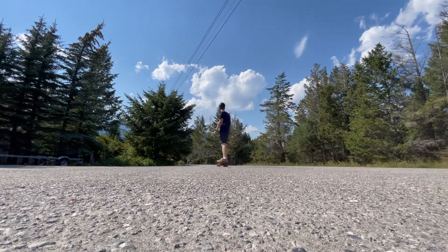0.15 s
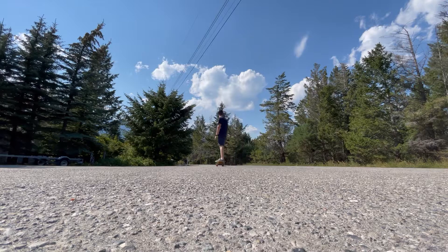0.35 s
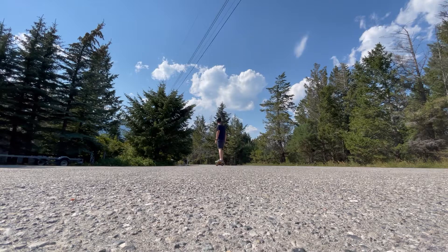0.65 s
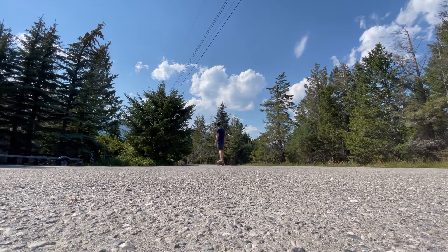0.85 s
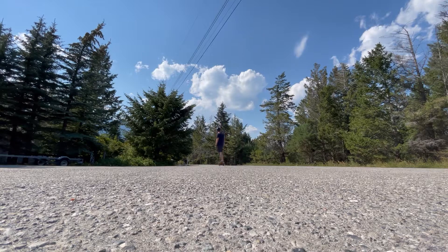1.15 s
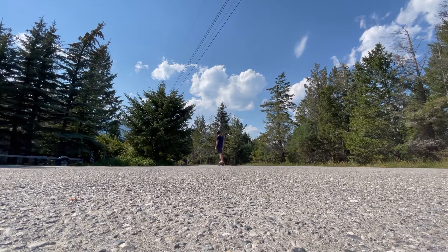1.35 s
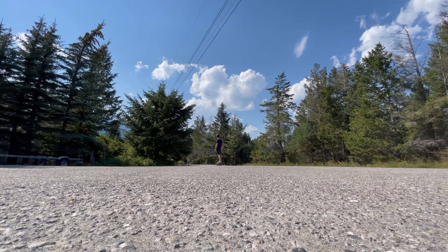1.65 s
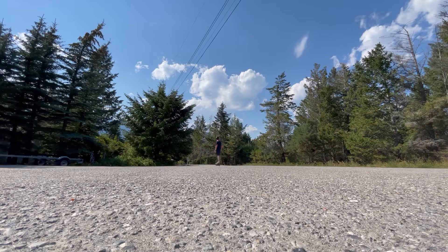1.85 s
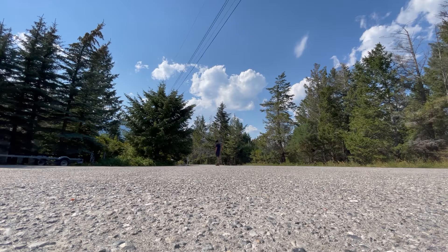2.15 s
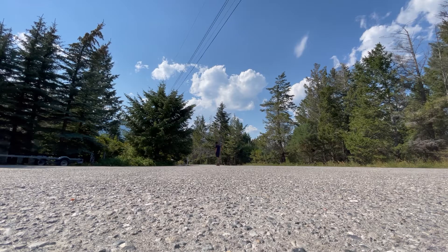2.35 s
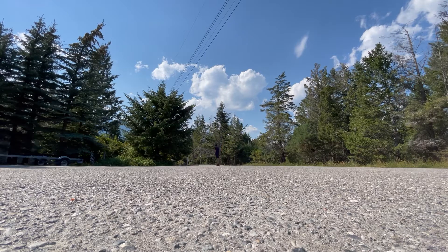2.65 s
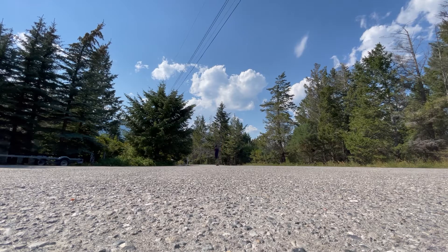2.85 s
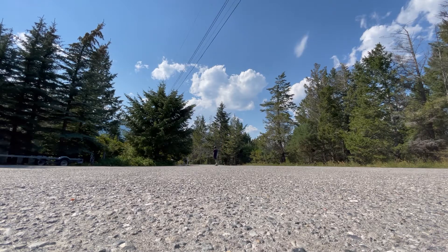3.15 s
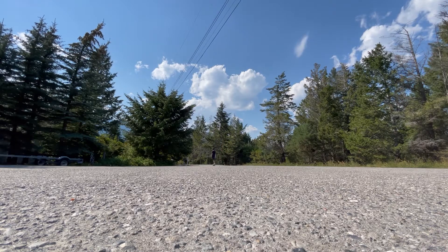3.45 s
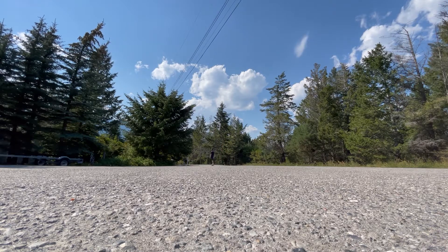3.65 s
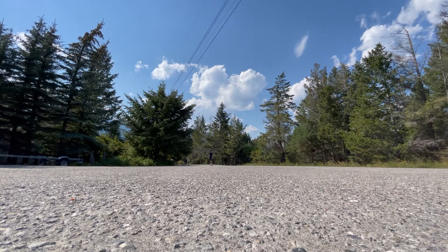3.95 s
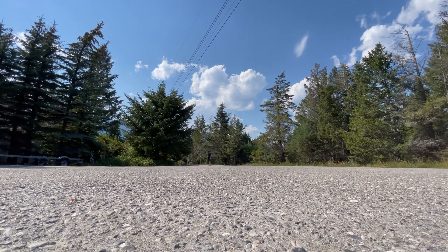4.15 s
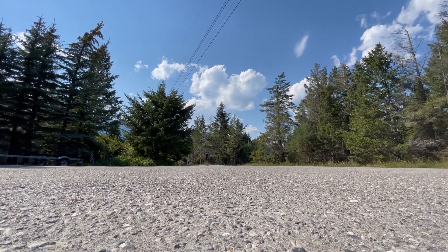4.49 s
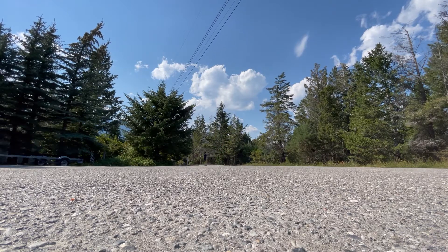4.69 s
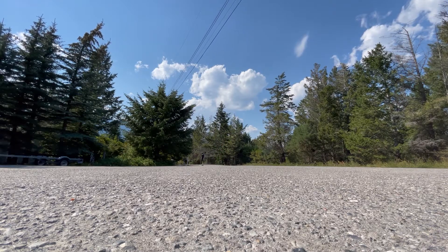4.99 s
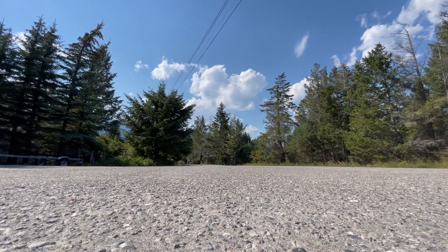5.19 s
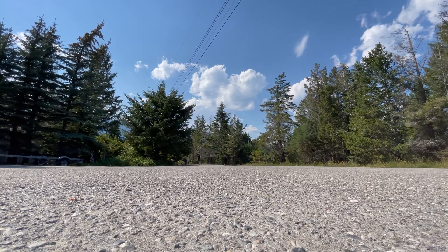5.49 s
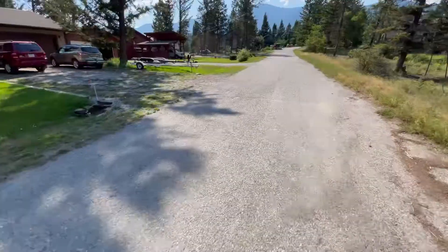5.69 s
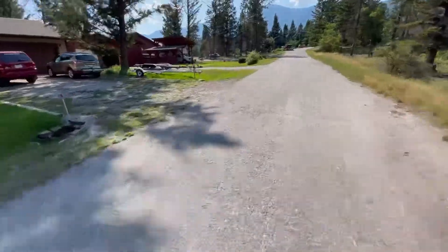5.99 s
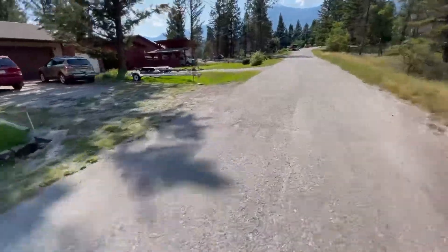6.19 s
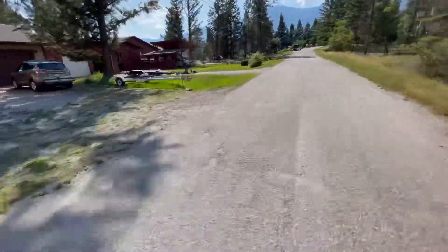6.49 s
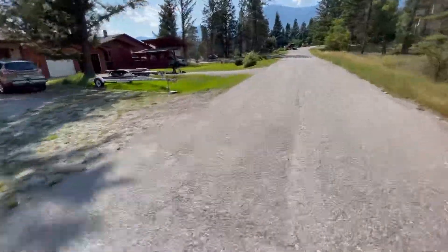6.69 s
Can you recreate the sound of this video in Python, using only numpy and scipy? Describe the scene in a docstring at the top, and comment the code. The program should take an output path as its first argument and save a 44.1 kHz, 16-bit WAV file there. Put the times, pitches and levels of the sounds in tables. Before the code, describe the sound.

A skateboard rumbles and clacks away over coarse asphalt, fading to faint rolling and bird chips, then abruptly a loud, close, bassy wheel rumble.

```python
"""An electric skateboard rolls away over coarse asphalt from a phone lying on the road: noise driven by
stony contact force rings deck, wheels and trucks, under a high whine, port wind and rustling trees.
Knocks, clacks, ticks and thuds are short bursts and damped tones; later a bird chips in gliding sines.
A cut, a blink of silence, then the same wheels heard from on board, loud enough to clip."""
import sys
import numpy as np
from scipy import signal
from scipy.fft import rfft, irfft, next_fast_len
from scipy.io import wavfile
from scipy.ndimage import uniform_filter1d

SR = 44100
rng = np.random.default_rng(int(sys.argv[2]) if len(sys.argv) > 2 else 0)


def generate_wav(sig):
    """Save sig (samples, or channels by samples) to the path in sys.argv[1] as 16-bit PCM at SR."""
    pcm = np.round(np.clip(np.atleast_2d(sig).T, -1, 1) * 32767).astype(np.int16)
    wavfile.write(sys.argv[1], SR, pcm)


N = 301203
FAST = next_fast_len(N)
T = np.arange(N) / SR
HZ = np.fft.rfftfreq(FAST, 1 / SR)


def undb(db):
    """Gain of a level in dB."""
    return 10 ** (np.asarray(db) / 20)


def level(x, db):
    """Scale so that the mean of the channels has this rms."""
    return x * undb(db) / np.sqrt(np.mean(np.atleast_2d(x).mean(axis=0) ** 2))


def spectrum(x):
    """Into the frequency domain."""
    return rfft(x, n=FAST)


def sound(bins):
    """Back into time."""
    return irfft(bins, FAST)[..., :N]


def over_hz(table):
    """Columns of a table, joined on a log-frequency axis."""
    hz, *columns = np.transpose(table)
    return [np.interp(np.log(HZ + 1), np.log(hz), c) for c in columns]


def causal(db):
    """Minimum-phase response with this gain, so nothing rings before a blow."""
    cepstrum = irfft(db * np.log(10) / 20, FAST)
    cepstrum[1:FAST // 2] *= 2
    cepstrum[FAST // 2 + 1:] = 0
    return np.exp(rfft(cepstrum))


def walk(rate):
    """Random levels held 1 / rate s and slewed twice; spread near 1."""
    k = int(SR / rate)
    steps = np.repeat(rng.standard_normal(N // k + 1), k)
    return np.sqrt(2) * uniform_filter1d(uniform_filter1d(steps, k), k)[:N]


def bursts(rows, t60_ms, rise_ms):
    """Envelope of blows (start_s, level_db): quick linear rise times a 60 dB exponential fall."""
    env = np.zeros(N)
    for start_s, level_db in rows:
        span = slice(int(start_s * SR), int(start_s * SR) + 8192)
        t = T[span] - start_s
        env[span] += undb(level_db - 60 * t / (t60_ms / 1000)) * np.clip(1000 * t / rise_ms, 0, 1)
    return env


def stones(rate, spread_db, decay_ms):
    """Uneven contact force: random stones of varied strength over a smooth road; rms 1."""
    hits = (rng.random(N) < rate / SR) * undb(spread_db * rng.exponential(size=N))
    force = 1 + signal.lfilter([1], [1, -np.exp(-1000 / decay_ms / SR)], hits)
    return force / np.sqrt(np.mean(force ** 2))


# rolling spectrum at the roadside and on board: hz [Hz], relative level_db [dB per Hz]
FAR_PATH = [(35, -36), (60, -7.5), (130, -3.5), (330, -3), (600, -3), (900, -6), (1230, -8), (1650, -8.5),
            (1850, -11), (2300, -14.5), (3500, -17.5), (5000, -23), (7300, -29.5), (11000, -41),
            (13000, -72)]
NEAR_PATH = [(60, -21.5), (170, -1), (400, 1), (600, -6), (900, -14.5), (1250, -21), (1900, -28),
             (2600, -36), (4000, -36.5), (7500, -41.5), (11000, -47.5), (12800, -70), (14000, -49),
             (15700, -50)]
# the two ports: hz [Hz], likeness [0-1], phase by which right leads [rad], left minus right pan_db [dB]
FAR_PORTS = [(60, .93, 0, -2), (240, .97, 0, -2), (390, .9, 0, -1.6), (650, .5, -.4, -1),
             (1100, .22, .7, -2.2), (1460, .9, 1.6, -2.7), (1800, .72, 2.1, -2.2),(2300, .62, 3, .8),
             (3600, .66, 3.6, -2.9), (5100, .66, 3.3, -3.6), (6200, .62, 3.3, -12.5),
             (8200, .34, 4.5, -8.5), (9800, .4, 4, 0), (11000, .75, 6.2, 1)]
NEAR_PORTS = [(100, .5, -1.2, .3), (200, .45, -.6, 0), (300, .58, .1, -.8), (500, .35, 1.1, -3.8),
              (1100, .62, 1, -1.2), (1460, .55, 2.5, -2.7), (1900, .48, 0, 4), (2300, .5, .3, 6),
              (3100, .68, 2.2, 2), (3700, .5, 2.5, -.5), (5000, .2, 5, -1.5), (7000, .35, 5.3, -3),
              (9800, .4, 4.6, -1), (11000, .62, 6.2, 0), (14000, .7, 7.6, -1)]
# resonances of deck, wheels and trucks: pitch_hz [Hz], width_hz [Hz], boost_db [dB]
FAR_MODES = [(85.2, 24, 12), (224, 110, 9.5), (295, 35, 4), (1040, 33, 8.5), (1490, 175, 8), (6060, 890, 4)]
NEAR_MODES = [(80, 61, 9.6), (295, 57, 2.8), (420, 110, 1), (1450, 210, 7.5), (3120, 690, 8.6),
              (6200, 350, 2.7)]


def wheels(force, path, ports, modes, share):
    """Noise driven by the contact force rings the board and reaches both ports, partly alike, partly scattered."""
    like, lead, pan_db = over_hz(ports)
    body_db = over_hz(path)[0] + 20 * np.log10(share)
    body_db = body_db + sum(boost / (1 + (2 * (HZ - hz) / width) ** 2) for hz, width, boost in modes)
    body = causal(body_db) * undb(np.array([pan_db, -pan_db]) / 2)
    turn = np.exp(np.array([-lead, lead]) * 1j / 2)
    both, *own = spectrum(rng.standard_normal((3, N)) * force)
    alike_power = like * abs((body * turn).mean(axis=0)) ** 2
    own_power = (1 - like) * (abs(body) ** 2).mean(axis=0) / 2
    heard = sound(body * (np.sqrt(like) * turn * both + np.sqrt(1 - like) * np.array(own)))
    return heard / np.sqrt((alike_power + own_power).mean())  # force 1 gives rms 1


def low_share(split_hz):
    """Amplitude share of the rolling sound below the split."""
    return 1 / np.sqrt(1 + (HZ / split_hz) ** 8)


def deck_share(deck_hz):
    """The heavy deck evens out single stones below this pitch."""
    return 1 / np.sqrt(1 + (HZ / deck_hz) ** 6)


def drone(drone_db, where, deck_hz):
    """Smooth rolling noise, free of single stones, rings the heavy deck."""
    return wheels(undb(drone_db), *where, deck_share(deck_hz))


def rumble(rumble_db, where, deck_hz, split_hz, stones_s, rattle_db):
    """Stones drum the wheels in the band between drone and grit."""
    share = low_share(split_hz) * np.sqrt(np.clip(1 - deck_share(deck_hz) ** 2, 1e-9, 1))
    return wheels(undb(rumble_db) * stones(stones_s, rattle_db, 1.5), *where, share)


def grit(grit_db, where, split_hz, rough_db):
    """Loose grains under the wheels hiss and crackle above the split."""
    share = np.sqrt(np.clip(1 - low_share(split_hz) ** 2, 1e-9, 1))
    return wheels(undb(grit_db) * stones(70, rough_db, 2.9), *where, share)


def whine(hz, width_hz):
    """Switching tone of the motor drive, blurred by load and speed."""
    core = 1 / (1 + ((HZ - hz) / width_hz) ** 2)
    skirt = .08 / (1 + ((HZ - hz) / (6 * width_hz)) ** 4)
    both, left, right = rng.standard_normal((3, N))
    return level(sound((core + skirt) * spectrum([both + .45 * left, both + 0.5 * right])), 0)


# wind pressure spectrum: hz [Hz], relative level_db [dB per Hz]
WIND = [(15, -44), (30, -8), (45, -3), (65, 4), (88, -3), (110, -3.5), (150, -11), (200, -23), (350, -23),
        (800, -57), (3000, -120)]
# gusts on the ports: middle_s [s], length_s [s], peak level_db [dB], left minus right pan_db [dB]
GUSTS = [(0.15, 0.26, -35, -8), (0.513, 0.15, -40, 1), (0.965, 0.19, -34, -2), (1.254, 0.23, -43, -13),
         (1.683, 0.12, -35, 0), (2.08, 0.19, -33, -4), (2.36, 0.13, -37.5, -11), (2.7, 0.4, -40.5, 1),
         (2.962, 0.1, -43, 12), (4.07, 0.12, -34.5, -3), (4.25, 0.063, -29.5, -4), (4.56, 0.16, -49, -9),
         (4.896, 0.3, -45, -4), (5.218, 0.098, -43, -8), (5.47, 0.26, -42, -10), (5.888, 0.12, -14.5, 2),
         (6.22, 0.13, -18, 1), (6.696, 0.23, -15.5, -1)]


def wind(breeze_db, opposed, bottom_hz):
    """Low buffeting, partly separate at each port, partly opposed; gusts swell and sink over a steady breeze."""
    power = undb(2 * breeze_db)
    for middle_s, length_s, level_db, pan_db in GUSTS:
        peak_power = undb(2 * level_db + np.array([[pan_db], [-pan_db]]))
        power = power + peak_power * np.exp(-(2 * (T - middle_s) / length_s) ** 2)
    both, left, right = rng.standard_normal((3, N))
    colour = undb(over_hz(WIND)[0]) * HZ ** 2 / (HZ ** 2 + bottom_hz ** 2)
    push = sound(colour * spectrum([left + opposed * both, right - opposed * both]))
    return push / np.std((push[0] - push[1]) / 2) * np.sqrt(power)


# rustle spectrum of the trees: hz [Hz], relative level_db [dB per Hz]
TREES = [(120, -42), (200, -36), (338, -4), (416, -8), (640, -0.5), (1600, -9), (1850, -13), (3300, -18.5),
         (3900, -20.5), (4400, -29), (9000, -37.5), (11700, -68), (19800, -120)]


def trees():
    """Soft, wide rustle of needles: shaped noise, separate at each port, its level wandering together."""
    rustle = rng.standard_normal((2, N)) * undb(walk(2.89))
    return level(sound(undb(over_hz(TREES)[0]) * spectrum(rustle)), -42)


# wheels over large stones: start_s [s], clack level_db [dB], clack pitch_hz [Hz],
# thump_db [dB relative to the clack]
BUMPS = [(0.032, -13, 1540, -5.5), (0.064, -11.5, 1480, -16), (0.1, -19, 1490, -19), (0.119, -25, 915, -11),
         (0.216, -14.5, 696, -5), (0.2195, -14.5, 1510, -12), (0.25, -22, 1510, -12),
         (0.254, -27, 690, -3.5), (0.343, -17, 1540, -11), (0.379, -16, 1520, -8), (0.393, -19, 1460, -10),
         (0.457, -21.5, 1180, -3.5), (0.492, -20, 1480, -10), (0.599, -18, 980, -2),
         (0.599, -21, 1520, -13), (0.633, -15.5, 1440, -6), (0.726, -21, 600, -11), (0.743, -20, 660, -3),
         (0.746, -19, 1540, -18), (0.795, -17.5, 1500, -5), (0.84, -19.5, 1440, -8),
         (0.971, -14.5, 1456, -11), (1.028, -21, 1030, -3), (1.173, -18.5, 1060, -15),
         (1.29, -22, 1440, -4), (1.323, -19.5, 678, -13), (1.367, -25, 1090, -20), (1.439, -20.5, 1010, -4),
         (1.476, -22, 1450, -4.5), (1.863, -27, 633, -2), (1.934, -28.5, 678, -6), (2.129, -27, 1040, -5),
         (2.215, -29, 668, -3), (2.351, -22, 670, -10), (2.573, -25.5, 1060, -6), (2.748, -27, 600, -11),
         (2.974, -19.5, 593, -4), (3.092, -27, 685, -8), (3.164, -27, 705, -12), (3.219, -35, 740, -13),
         (3.25, -22, 780, -12), (3.546, -32, 1490, 2), (3.662, -31, 740, -14), (3.905, -23.5, 1050, -8),
         (4.019, -25, 1510, -1.5), (4.259, -29, 635, -4), (4.353, -25, 1460, -3), (4.611, -27, 1460, -2.5),
         (4.909, -29, 710, -11), (4.932, -29, 800, -6), (4.955, -25, 750, -8), (5.213, -32, 775, -8),
         (5.348, -32.5, 974, -1), (5.703, -13, 706, -12), (5.73, -12, 651, -6), (5.744, -8.5, 622, -6),
         (5.748, -22, 1450, -8), (5.81, -23, 651, -4), (5.833, -10, 614, -9), (5.851, -7.5, 650, -9),
         (5.885, -11, 600, -18), (5.964, -13, 705, -11), (5.966, -25, 2500, -8), (6.024, -15, 700, -8),
         (6.061, -7, 608, -5.5), (6.093, -15, 660, -10), (6.075, -25, 2200, -8), (6.12, -18, 756, 6),
         (6.121, -21, 1480, -10), (6.122, -24, 2870, -10), (6.143, -22, 751, -10), (6.164, -23, 746, -9),
         (6.18, -21, 680, -8), (6.21, -10, 600, -4.5), (6.266, -13.5, 620, 1.5), (6.28, -22, 2700, -12),
         (6.308, -14, 630, -3), (6.329, -9.5, 720, -6), (6.362, -12, 676, -1.5), (6.443, -13, 607, -2),
         (6.486, -8.5, 676, -5), (6.573, -31, 644, -8), (6.632, -23, 697, -13), (6.664, -14.5, 920, 3),
         (6.675, -24, 1900, -8), (6.693, -9, 800, -5), (6.724, -21, 622, -9), (6.771, -14, 634, 4),
         (6.814, -16, 751, 3)]


def knocks(where, knock_hz):
    """Thumps of noise as wheels hit large stones: less bass than rolling, the top rounded by soft wheels."""
    force = bursts([(at, db + thump_db) for at, db, _, thump_db in BUMPS], t60_ms=70, rise_ms=3.6)
    return wheels(force, *where, (HZ + 1) / (HZ + knock_hz) / np.sqrt(1 + (HZ / 2800) ** 4))


def rings(rows, ports, t60_ms, rise_ms):
    """A few damped cycles for each blow (start_s, level_db, pitch_hz), shifted between the ports."""
    out, t = np.zeros((2, N + 4096)), T[:4096]
    half = np.array([[1], [-1]]) / 2
    hz_at, like, lead, pan_db = np.transpose(ports)
    fall = undb(-60 * t / (t60_ms / 1000)) * np.clip(1000 * t / rise_ms, 0, 1)
    for start_s, level_db, hz in rows:
        # each blow lands at its own spot
        scatter = rng.standard_normal() * np.arccos(np.interp(hz, hz_at, like))
        turn = np.interp(hz, hz_at, lead) + scatter
        gain = undb(level_db + half * np.interp(hz, hz_at, pan_db))
        start = int(start_s * SR)
        out[:, start:start + 4096] += np.sin(2 * np.pi * hz * t - half * turn) * gain * fall
    return out[:, :N]


def clacks(ports):
    """The short pitched ring of each wheel blow on a large stone."""
    return rings([row[:3] for row in BUMPS], ports, t60_ms=25, rise_ms=0.71)


# grit cracking or thrown against the deck: start_s [s], blow level_db [dB], bright_db [dB]
TICKS = [(0.0333, -34, -4), (0.0865, -20, -1), (0.0975, -36, 6), (0.171, -39, 15), (0.2119, -33.5, 4),
         (0.252, -36, -2), (0.3443, -31, 3), (0.376, -33, -3), (0.391, -32, -1), (0.458, -37, 3),
         (0.5957, -25, 0), (0.727, -35, 8), (0.7425, -30, 0), (0.9268, -40, 0), (0.9705, -34, -3),
         (1.3786, -42, -2), (1.4067, -38, -4), (1.5934, -37, 2), (2.0976, -39, -6), (2.2473, -41, -4),
         (2.441, -43, 1), (2.4624, -25, -5), (2.6195, -42.5, 11), (2.785, -45, 4), (3.6725, -37.5, -5),
         (4.1066, -43, -6), (4.342, -43, -8), (5.7262, -25, -5), (5.812, -37, 0), (5.9457, -35, -3),
         (5.9668, -33, -6), (6.03, -33, 4), (6.066, -35, 3), (6.1218, -29, -6), (6.1253, -30, 12),
         (6.1572, -33.5, 11), (6.2091, -34, -6), (6.266, -29, 0), (6.2785, -18.5, -2), (6.3285, -18.5, -6),
         (6.3612, -27, 0), (6.3907, -37, 0), (6.401, -38, 0), (6.415, -35, -2), (6.457, -31, 5),
         (6.47, -22, -4), (6.487, -18.5, -3.5), (6.6576, -35, 0), (6.6696, -30, 3), (6.775, -30, 0),
         (6.822, -23.5, -3)]


def ticks(where, tick_hz):
    """Sharp grains make very short bursts, brighter than rolling, that ring the trucks."""
    bright = (HZ + 1) ** 2 / (HZ ** 2 + tick_hz ** 2) * (1 + HZ / 3000) ** 0.95
    trucks = undb(5 / (1 + ((HZ - 5900) / 1200) ** 2))
    snaps = wheels(bursts([row[:2] for row in TICKS], t60_ms=15, rise_ms=0.42), *where, bright * trucks)
    start_s, _, bright_db = np.transpose(TICKS)
    dull = sound(spectrum(snaps) / (1 + (HZ / 7300) ** 6))
    latest = np.clip(np.searchsorted(start_s, T) - 1, 0, None)
    return dull + (snaps - dull) * undb(bright_db[latest])  # each grain has its own edge


# the deck jolted into a short low ring: start_s [s], level_db [dB], pitch_hz [Hz]
THUDS = [(0.035, -17, 243), (0.139, -17, 193), (0.185, -21, 230), (0.218, -14, 254), (0.259, -18, 198),
         (0.356, -18.5, 199), (0.389, -25, 237), (0.464, -17, 193), (0.519, -21, 235), (0.597, -19, 231),
         (0.725, -18, 224), (0.808, -20, 260), (0.858, -27, 216), (1.03, -22, 258), (1.096, -20, 187),
         (1.179, -17.5, 220), (1.319, -16, 256), (1.499, -25, 175), (1.859, -23, 285), (2.049, -27, 310),
         (2.348, -29, 199), (2.974, -16.5, 245), (3.229, -22, 250), (4.019, -37, 246), (4.254, -28, 184),
         (4.929, -31, 191), (5.672, -9, 248), (5.709, -9, 339), (5.744, -8, 295), (5.779, -12, 513),
         (5.829, -8, 213), (5.885, -10.5, 221), (5.933, -8, 196), (5.963, -3, 260), (5.994, -4.5, 266),
         (6.025, -3.5, 329.5), (6.059, -7, 341), (6.094, -6, 206), (6.124, -1.5, 295), (6.145, -5, 367),
         (6.169, -9, 320), (6.209, -6, 288), (6.245, -9, 223), (6.309, -10, 290), (6.359, -10.5, 301),
         (6.399, -5.5, 406), (6.419, -4, 300), (6.439, -2, 336), (6.454, -13, 312), (6.519, -2, 357),
         (6.544, -5, 342), (6.589, -8, 212), (6.624, -7, 308), (6.654, -4, 235), (6.689, -8, 307),
         (6.734, -5, 285), (6.771, -7, 448), (6.814, -9, 288)]


def thuds(ports):
    """The jolted deck rings low, softer in onset and longer than a clack."""
    return rings(THUDS, ports, t60_ms=98, rise_ms=5.7)


# corners of the treble loss: step_hz [Hz]
AIR_STEPS_HZ = (3970, 7000, 10600)


def air(x, loss_db):
    """Distance dulls the treble: the loss applies once more above each step."""
    for hz in AIR_STEPS_HZ:
        low = sound(spectrum(x) / (1 + (HZ / hz) ** 6))
        x = low + (x - low) * undb(-loss_db)
    return x


# the road under the wheels: start_s [s], coarse_db for drone and rumble [dB], loose_db for grit [dB]
ROAD = [(0.05, 0.5, 1.5), (0.13, -1, 1.5), (0.19, -3.5, -2), (0.25, -3, 3.5), (0.3, -6, -6),
        (0.37, -1.5, 1.5), (0.43, -3.5, -3), (0.48, -3.5, 1), (0.57, -2.5, -2), (0.67, 0, 3.5),
        (0.75, 1, 4), (0.92, 0, 1.5), (1.2, -0.5, -2), (1.4, 1, 1.5), (1.56, -1, 0.5), (1.62, -3.5, -1),
        (1.78, 0, 0), (2.15, 0.5, 1), (2.36, 2, 3), (2.43, -0.5, -0.5), (2.54, -0.5, 1), (2.75, -1, -0.5),
        (2.94, -0.5, -1), (3.0, 2, 5), (3.12, -0.5, -5.5), (3.23, 4, 5.5), (3.33, -3, 2), (3.42, 0, -3.5),
        (3.51, -2.5, -4), (3.58, -0.5, -0.5), (3.82, 1, 6), (3.95, 0, 3.5), (4.12, 3.5, 6.5), (4.19, 1, 5),
        (4.32, -5, -2), (4.46, 2, 4.5), (4.53, -1.5, 2), (4.62, 2.5, 6.5), (4.82, -3.5, -3),
        (4.88, -1.5, -6), (4.91, 5.5, 2), (4.96, 3.5, 5), (5.0, 0.5, 2.5), (5.12, -2.5, -4), (5.22, -2, 0),
        (5.64, -4, -11), (5.68, 1, 4.5), (5.715, -6.5, 0), (5.75, 1, 3), (5.91, -1.5, 0), (6.02, 1, -1),
        (6.13, -1.5, -1), (6.2, 0.5, -4), (6.26, -1, -2.5), (6.34, -0.5, -4), (6.41, 0.5, 2.5),
        (6.44, 1.5, -5), (6.48, 1, 3.5), (6.54, 0.5, -4.5), (6.57, -1.5, -5), (6.65, -1, -4.5),
        (6.68, -1, 3.5), (6.73, 3, -1.5), (6.79, 1, -1.5), (6.83, 3, 3)]


def board(drone_db, rumble_db, grit_db, where, deck_hz, split_hz, knock_hz, tick_hz, patchy_db,
          stones_s, rattle_db, rough_db, whine_db, air_db_s):
    """The whole board on the changing road, for one place of the phone (path, ports, modes)."""
    start_s, coarse_db, loose_db = np.transpose(ROAD)
    coarse_db = np.interp(T, start_s, coarse_db)
    texture_db = patchy_db * walk(20)  # small patches shake rumble and grit together
    loss_db = air_db_s * T
    # the road soaks up the rattle with distance
    rumble_db = rumble_db + coarse_db + texture_db - 0.11 * loss_db
    grit_db = grit_db + np.interp(T, start_s, loose_db) + texture_db + 0.7 * walk(8)
    treble = grit(grit_db, where, split_hz, rough_db)
    if whine_db is not None:
        treble += undb(grit_db + whine_db - 2.3 * loss_db) * whine(15490, 30)
    out = drone(drone_db + coarse_db, where, deck_hz)
    out += rumble(rumble_db, where, deck_hz, split_hz, stones_s, rattle_db)
    out += air(treble + knocks(where, knock_hz), loss_db)
    return out + clacks(where[1]) + ticks(where, tick_hz) + thuds(where[1])


# bird chips: start_s [s], peak level_db [dB], lowest pitch_hz [Hz], left minus right pan_db [dB]
CHIPS = [(4.4857, -49, 6530, -7.0), (4.7252, -58, 6500, -17), (5.187, -54, 6480, -12),
         (5.443, -50, 6370, -14), (5.6341, -49, 6460, -14)]
# course of one chip: time_s from its start [s], pitch ratio to the lowest [1], level_db [dB]
CHIP_SHAPE = [(-.005, 1.22, -30), (0, 1.02, -4), (.005, 1, 0), (.010, 1.02, -3), (.014, 1.3, -12),
              (.018, 1.08, -14), (.022, 1.06, -12), (.028, 1.3, -30)]


def bird():
    """Short chips: a dip to the lowest note, a flick up and a weaker second dip."""
    out = np.zeros((2, N))
    time_s, ratio, shape_db = np.transpose(CHIP_SHAPE)
    for start_s, level_db, hz, pan_db in CHIPS:
        t = T - start_s
        phase = 2 * np.pi * np.cumsum(hz * np.interp(t, time_s, ratio)) / SR
        tone = np.sin(phase) * undb(np.interp(t, time_s, shape_db, -200, -200))
        out += tone * undb(level_db + np.array([[pan_db], [-pan_db]]) / 2)
    tail = rng.standard_normal((2, 3000)) * undb(-28 - 60 * T[:3000] / 0.11)  # trunks scatter each chip
    return out + signal.fftconvolve(out, tail, axes=1)[:, :N]


FAR_END_S, NEAR_START_S = 5.6655, 5.6712
START_M, SPEED_M_S = 5.91, 4.07  # distance from the roadside phone at the start, and speed away


def scene():
    """The roadside shot, a short gap, then the ride."""
    spread_db = -20 * np.log10(START_M + SPEED_M_S * T)  # sound thins as 1 / distance
    # roadside levels as at 1 m
    far = board(-9.5 + spread_db, -13 + spread_db, -24 + spread_db, (FAR_PATH, FAR_PORTS, FAR_MODES),
                deck_hz=434, split_hz=2100, knock_hz=250, tick_hz=3500, patchy_db=1.57,
                stones_s=260, rattle_db=-0.4, rough_db=-0.5, whine_db=-18.5, air_db_s=1.0)
    far += wind(breeze_db=-49, opposed=0.5, bottom_hz=6.9) + trees() + bird()
    near = board(-15.5, -22.5, -36, (NEAR_PATH, NEAR_PORTS, NEAR_MODES),
                 deck_hz=544, split_hz=1840, knock_hz=600, tick_hz=1960, patchy_db=0.76,
                 stones_s=330, rattle_db=2.0, rough_db=0.4, whine_db=None, air_db_s=0)
    near += wind(breeze_db=-22, opposed=0.74, bottom_hz=56.5)
    return far * (T < FAR_END_S) + near * np.clip((T - NEAR_START_S) * 1000, 0, 1)


def record(dry):
    """The loudest peaks clip, the top is cut above 16 kHz, and any overshoot clips again."""
    top_cut = signal.ellip(8, .2, 70, 16000, fs=SR, output="sos")
    return np.clip(signal.sosfilt(top_cut, np.clip(dry, -1, 1)), -1, 1)


dry = scene()
out = record(dry)
generate_wav(out)
```